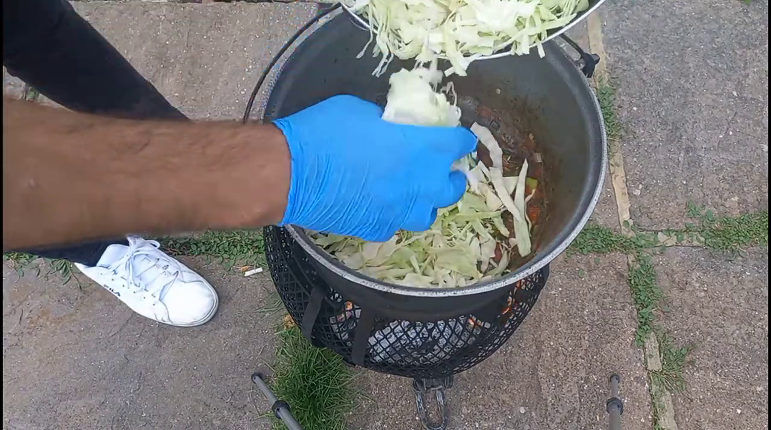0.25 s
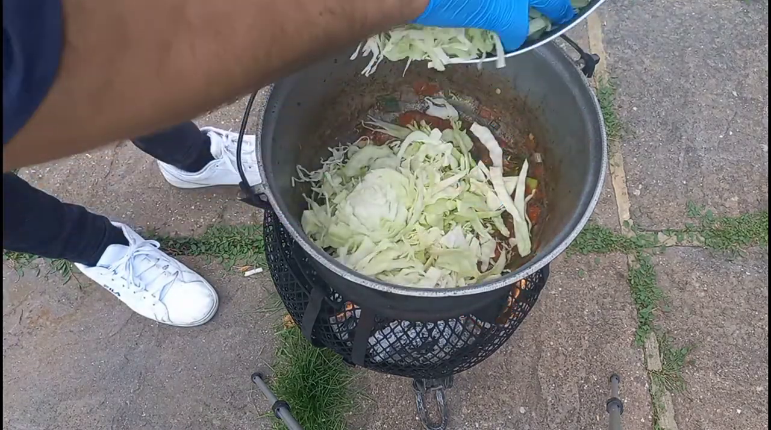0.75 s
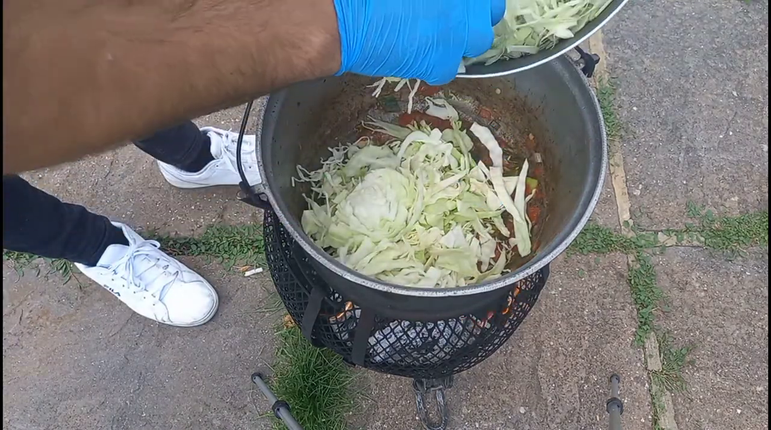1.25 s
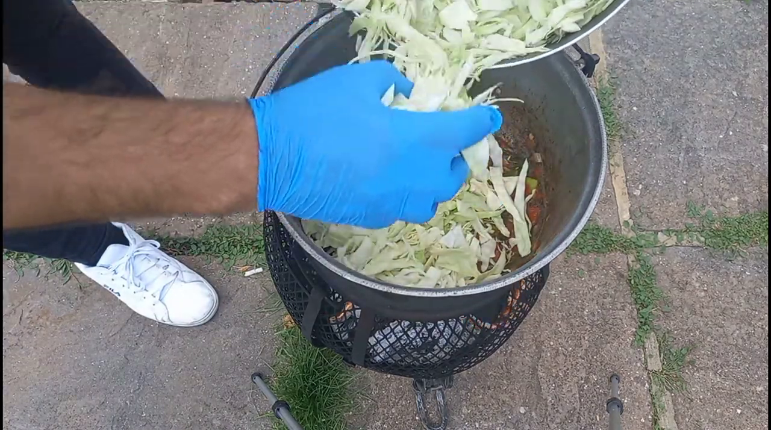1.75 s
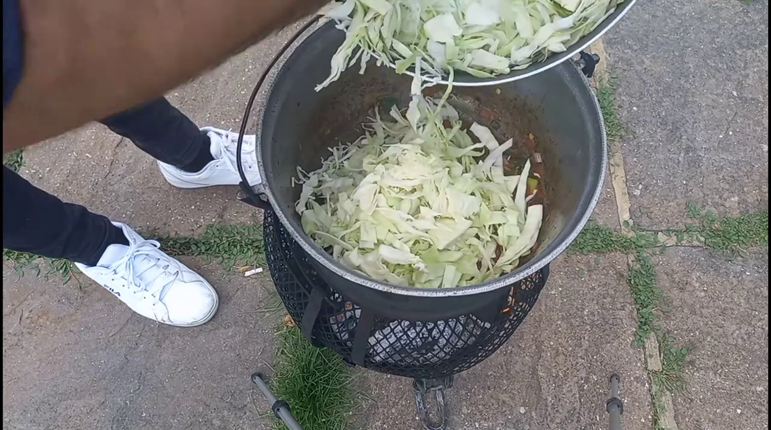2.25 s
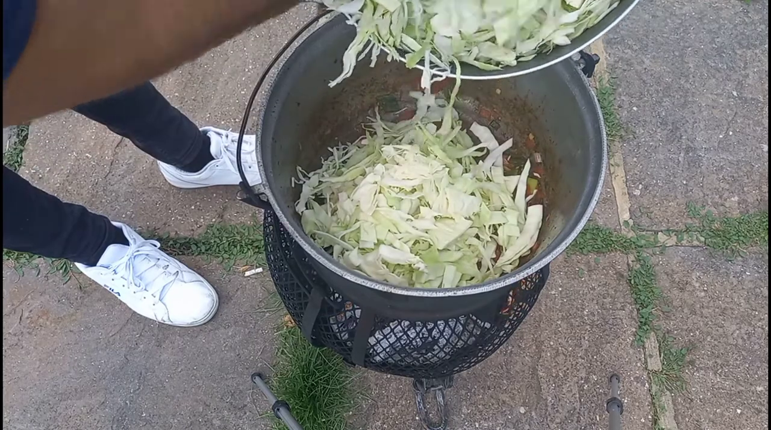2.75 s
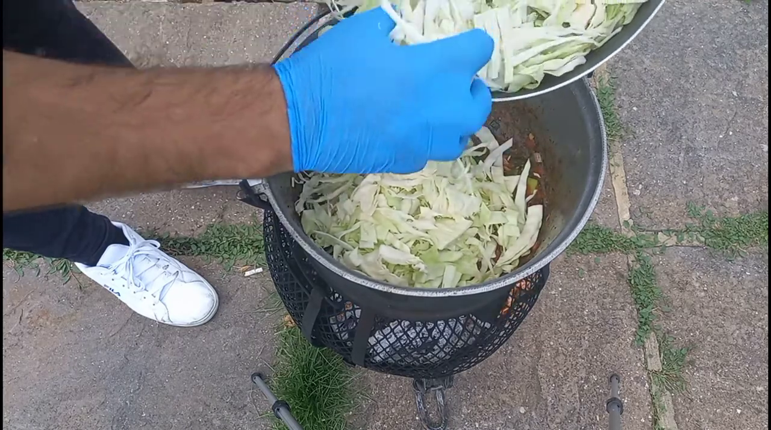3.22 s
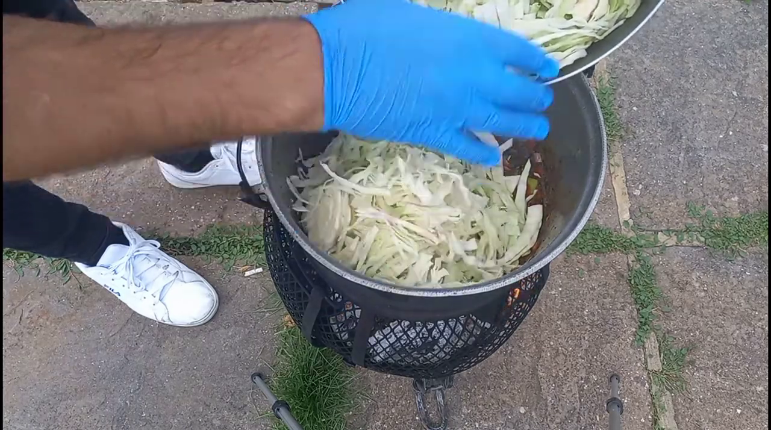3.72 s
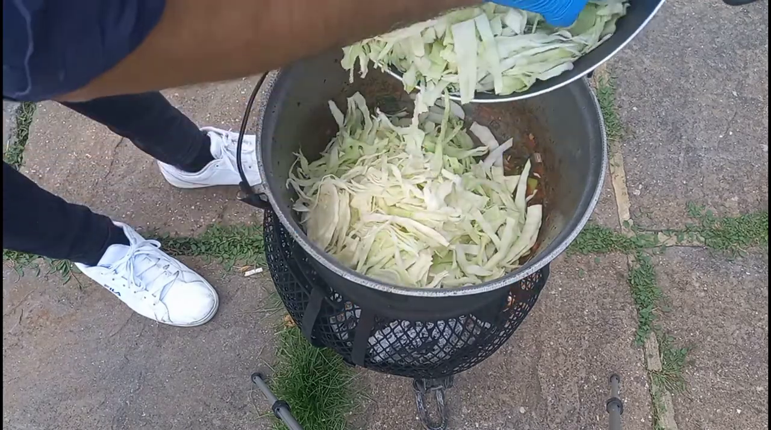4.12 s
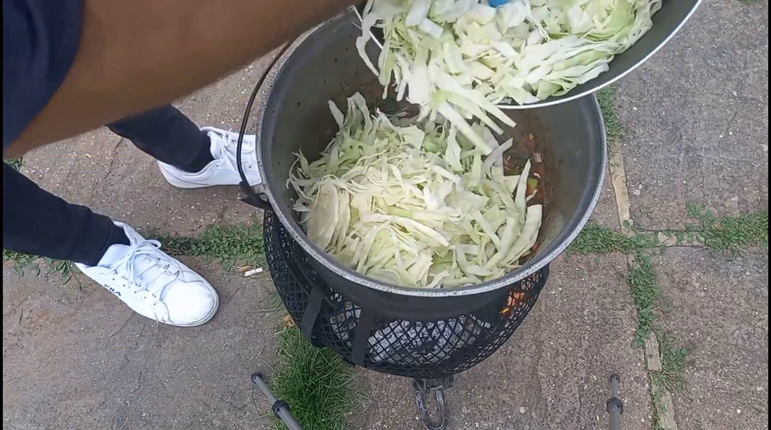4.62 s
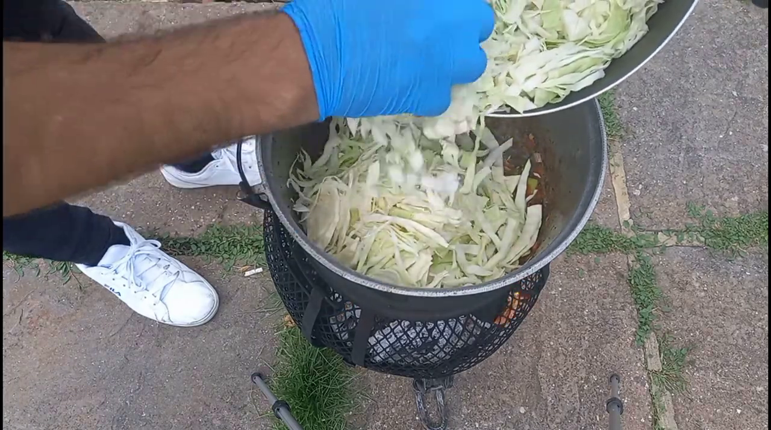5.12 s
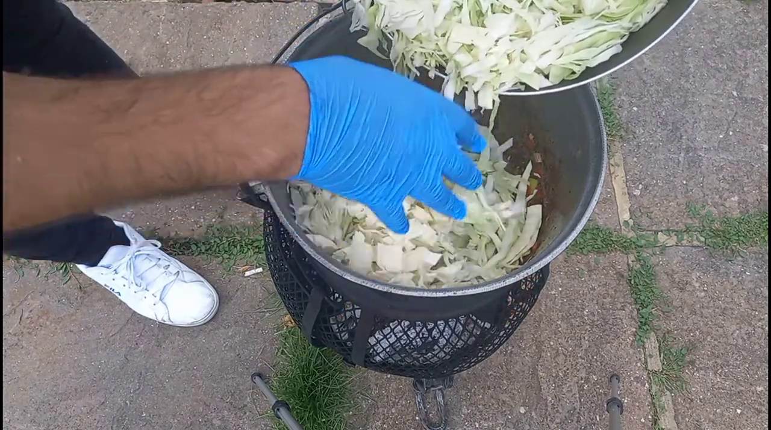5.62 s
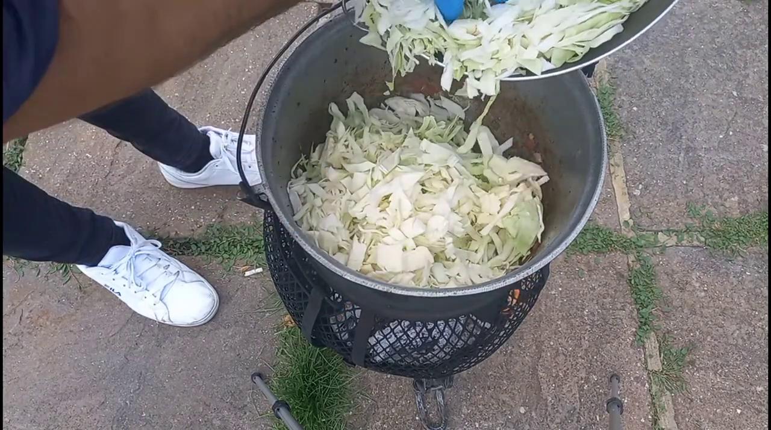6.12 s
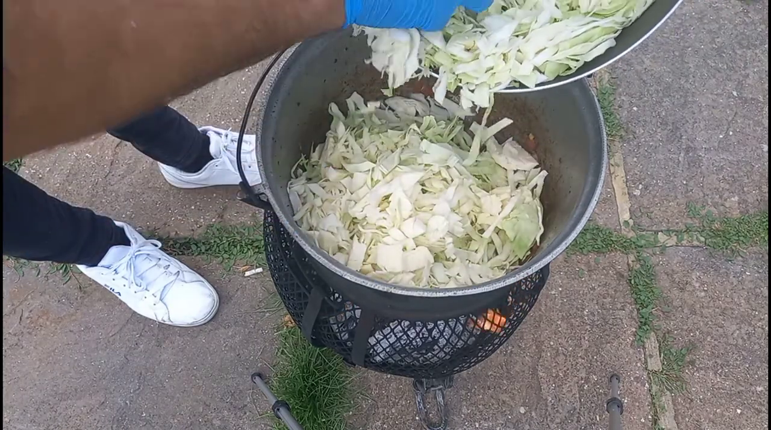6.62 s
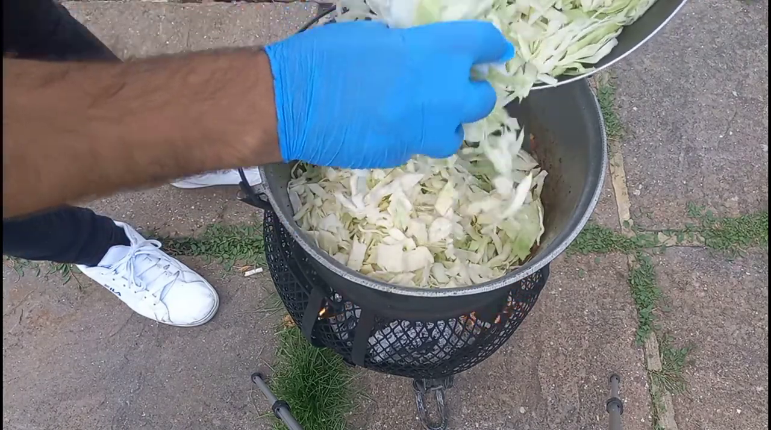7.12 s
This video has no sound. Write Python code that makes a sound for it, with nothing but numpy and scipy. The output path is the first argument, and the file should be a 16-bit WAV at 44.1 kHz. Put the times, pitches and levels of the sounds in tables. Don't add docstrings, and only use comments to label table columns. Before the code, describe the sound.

Quiet sauce simmers while leafy shreds are grabbed and dropped, each stroke starting crisply and fading. Wind thumps softly in the microphone, mostly early. A light metallic tick, later a fuller bowl-on-pot knock with short ring and low boom, punctuate the work. The busiest moment is a stuttering glove rub on hollow metal midway, followed by bright spits, soft bumps and another scrape. Dry open air, near microphone, distant traffic rumble.

```python
import sys
import numpy as np
from scipy import signal
from scipy.io import wavfile

SR = 44100
rng = np.random.default_rng(int(sys.argv[2]) if len(sys.argv) > 2 else 0)


def int16_out(signal):
    q = np.round(np.clip(np.atleast_2d(signal).T, -1, 1) * 32767)
    wavfile.write(sys.argv[1], SR, q.astype(np.int16))


def boost(x):
    u = np.asarray(x, float) / 20
    return 10 ** u


N = 325017

# pitch_hz, level_db (per Hz)
TRAFFIC_COLOUR = [(53, -0.5), (90, -4), (173, -10), (410, -13), (519, -25.5), (705, -20), (799, -13.5),
                  (1030, -21.5), (1230, -32), (1650, -20), (2500, -51), (3250, -37), (5500, -120)]
# pitch_hz, likeness (1 = the same)
LEFT_RIGHT_LIKENESS = [(60, 1), (120, 0.76), (240, 0.94), (480, 0.15), (950, 0.12), (1890, 0.9),
                       (3770, 0.22), (7520, -0.12), (15000, -0.024)]
# time_s, rumble_db, centre_hz
WIND_RUMBLE = [(0.0, -57, 61.6), (0.35, -46.5, 59.4), (0.75, -61, 51.4), (1.03, -64, 45.6),
               (1.46, -48, 50.3), (1.89, -67, 63), (2.73, -63.5, 73), (3.04, -67, 85), (3.6, -70, 85),
               (4.2, -66.5, 84.6), (4.64, -51, 85), (5.03, -62, 94), (5.25, -54.5, 70.4), (5.81, -60, 70),
               (6.42, -54.5, 51), (7.08, -52.5, 59), (7.2, -63, 60.8), (7.37, -54.5, 60.4)]
# peak_s, peak_db, left_right_db, upper_rumble_db
WIND_PUFFS = [(0.0, -37, 0, 4), (0.53, -45, 0.5, 2.5), (0.679, -42.5, 1, 1), (0.8, -47.5, -1.5, 5),
              (0.92, -44.5, 0, 5), (1.27, -49, -2, 6), (1.58, -47.5, 0, 1), (2.0, -54, 3, -3),
              (2.2, -52, 1, -8), (3.14, -48, -3, -2), (3.6, -68, 0.1, -18), (3.86, -58, 0.1, -3),
              (4.02, -56, -1, -3), (4.33, -64, 0.1, -2), (5.25, -49.5, 0, -5), (6.17, -46, -1.5, 4),
              (6.3, -46.5, 1, 6), (6.9, -55, 0.7, 0.1), (7.295, -44.5, 10.5, 3.5)]
# time_s, level_db
SAUCE_LEVEL = [
    (0.0, -68.5),
    (2.34, -64.5),
    (2.61, -63),
    (3.49, -69),
    (4.0, -65.5),
    (4.25, -61),
    (5.87, -71),
    (6.2, -62),
    (7.02, -69.5),
    (7.37, -68),
]
# pitch_hz, level_db (per Hz)
SIZZLE_COLOUR = [(710, -50), (1200, -2), (1640, -6), (2560, -8.5), (3040, -0.5), (3970, -3.5), (5950, -1),
                 (7220, 0), (10200, -8.5), (12700, -11), (14600, -19), (15400, -19)]
# start_s, peak_db, pitch_hz, left_right_db
SNAP_EVENTS = [(0.308, -43, 7000, -4), (0.386, -56, 3220, 4), (0.6883, -41, 7460, 8), (0.858, -37, 7360, 5),
               (0.9707, -53, 7700, 0.5), (2.557, -33.5, 8600, 4), (2.7453, -34, 7240, 0),
               (2.8689, -43, 7300, -1), (3.3323, -49, 6900, -3), (3.775, -45.5, 4620, -1),
               (3.9918, -47, 11600, 1.5), (4.19, -38, 7000, 0.3), (4.2957, -31, 7660, -4),
               (4.313, -28, 7800, 0.3), (4.331, -31, 13500, 0.3), (4.349, -33, 7000, 0.3),
               (4.372, -28, 3200, 7), (4.384, -38, 12000, 0.3), (4.5161, -50.5, 6640, -1),
               (5.1069, -17.5, 8470, 2), (5.2703, -44, 12200, 11), (5.366, -38.5, 8700, -6),
               (5.383, -47, 13000, 2.5), (5.396, -43, 11200, 6), (5.633, -52, 7500, 1.5),
               (5.87, -53, 13000, 1.5), (5.664, -45, 12600, 8), (5.9334, -46, 7200, 0),
               (5.9504, -39.5, 8700, 8), (5.9665, -26, 8530, 1.5), (5.9968, -37, 8100, 2),
               (6.0243, -38, 7140, -5), (6.2228, -43, 3260, -1.0), (6.438, -33, 3100, -6),
               (6.4727, -35, 3690, -9), (6.839, -46, 8300, 4), (7.084, -47, 6800, 1.0),
               (7.115, -52, 4000, -8), (7.211, -49, 8100, -2.5), (7.229, -50, 9027, -3),
               (7.2569, -46, 8100, 0), (7.304, -43, 4200, -3)]
# start_s, peak_db, ring_db, boom_db, hardness_db (per octave)
KNOCK_EVENTS = [(1.2493, -23, -20.5, -35.5, 12), (1.2527, -25.5, -13, -39, 3), (1.262, -41.5, -2, -34, 0),
                (1.2794, -46.5, -1, -8, 1), (3.0729, -23.5, -3, -28, 12), (3.077, -30, -11, -50, 26),
                (3.08, -35, -12, -40, 10), (3.0858, -29.5, -4, -14, 1.5), (3.0877, -31, -7, -22, 7),
                (3.092, -34, -11, -9.5, 12), (3.0995, -51, -9, -15, 5), (3.11, -42.5, 0, -3.5, 3),
                (3.169, -49.5, -10, 3, -8.5), (3.19, -54, -3, -12, 12)]
# pitch_hz, level_db, t60_s (time to fall 60 dB)
BOWL_TONES = [(803, -22.5, 0.51), (903, -17, 0.18), (988, -19.5, 0.14), (1320, -19.5, 0.15),
              (1610, -20, 0.1), (2095, -11, 0.21), (2090.5, -28, 0.6), (2260, -17, 0.046),
              (2505, -9, 0.036), (2772, -17, 0.14), (2640, -17, 0.07), (2890, -20, 0.064),
              (2990, -16, 0.15), (3340, -28, 0.11), (3150, -14, 0.093), (3530, -11, 0.14),
              (3810, -2.5, 0.052), (3740, -8, 0.07), (3584, -11, 0.072), (4021, -20, 0.043),
              (4300, -12, 0.069), (4870, -13, 0.066), (5700, -18, 0.06), (7000, -29, 0.015),
              (5900, -9, 0.02), (7700, -25, 0.035)]
# pitch_hz, level_db, t60_s
CAULDRON_TONES = [(230.5, -4.5, 0.28), (246, -6.5, 0.17), (410, -18, 0.062)]
# pitch_hz, level_db (per Hz)
CRACK_COLOUR = [(470, -54), (800, -40), (3240, -9), (3800, -3.5), (5060, 2), (6980, 4), (10600, -6.5),
                (11400, -1), (15400, -22)]
# start_s, length_s, pitch_hz, level_db, width_hz
SQUEAK_EVENTS = [(0.25, 0.2, 1730, -59, 130), (1.146, 0.09, 2110, -54, 150), (1.17, 0.06, 2800, -50, 220),
                 (1.235, 0.07, 2094, -63, 190), (1.4, 0.05, 1637, -49, 120), (1.264, .07, 3800, -58, 130),
                 (1.323, 0.074, 790, -55.5, 140), (1.952, 0.098, 800, -56, 68), (5.3, 0.65, 995, -65, 130),
                 (5.58, 0.22, 1600, -66, 20), (5.65, 0.1, 2094, -66, 30), (6.238, 0.055, 3280, -48, 420),
                 (6.22, 0.18, 1470, -54, 330), (6.1, 0.41, 1440, -61, 450), (6.435, 0.13, 1510, -58, 360),
                 (6.461, 0.028, 4600, -39.5, 2100), (6.497, 0.039, 2800, -49.5, 630),
                 (0.419, 0.071, 1700, -50, 420), (4.88, 0.13, 210, -49, 89), (4.28, 0.058, 634, -30.5, 62),
                 (4.355, 0.045, 2700, -44, 750), (4.22, 0.17, 1180, -43, 700),
                 (7.073, 0.06, 6950, -55, 460), (7.178, 0.055, 7100, -64, 400), (3.2, 0.17, 790, -60, 81),
                 (4.3, 0.08, 2000, -51, 100)]
# pitch_hz, width_hz, level_db
BELLY_TONES = [(355.3, 42, 4.5), (436, 27.5, 4), (503, 34, -3), (623, 62, -6.5), (802, 120, -8.5),
               (1332, 165, -7.5), (1844, 50, -13.5), (2400, 23, -24), (3380, 130, -18)]
# peak_s, hum_db, swell_s (10 dB), fade_s (10 dB)
GLOVE_RUBS = [(0.681, -44, -0.16, -0.22), (0.86, -58.5, 0.04, 0.34), (1.27, -59, 0.1, .2),
              (1.97, -51.5, -0.08, 0.06), (2.36, -55, -0.74, 0.2), (2.44, -48, -0.45, -0.16),
              (2.54, -55.5, -0.32, 0.2), (2.69, -49, -0.23, -0.28), (3.1, -49, -0.5, 0.08),
              (3.18, -46.5, -0.12, -0.07), (4.1, -51.5, -0.06, 0.14), (4.16, -38.5, -0.0648, 0.2654),
              (4.252, -29, -0.0315, 0.104), (4.304, -32.5, -0.0377, 0.0871), (4.427, -39.5, 0.09, 0),
              (4.5, -70, 0.5, 0.5), (4.701, -40.5, -0.04, 0.126), (4.819, -34, -0.0872, -0.0365),
              (4.91, -53, 0.24, 0.09), (6.01, -50, -0.22, 0.14), (6.079, -46, -0.19, 0.29),
              (6.3, -50, 0.07, -0.25), (6.38, -59, -0.5, 0.2)]
# start_s, jerk_db
HAND_JERKS = [(0.438, -52), (4.164, -44), (4.23, -35), (4.263, -27), (4.269, -22), (4.299, -34),
              (4.339, -31), (4.36, -25.5), (4.373, -28), (4.381, -34), (4.691, -35.5), (4.809, -46),
              (6.251, -45), (6.271, -43.5)]
# start_s, peak_db, pitch_hz, t60_s
BELLY_BUMPS = [
    (0.671, -53.5, 393, 0.24),
    (1.97, -56.5, 394, 0.21),
    (2.359, -42, 352, 0.1),
    (4.893, -52, 324.6, 0.47),
    (4.905, -44, 353.3, 0.33),
    (4.92, -45.5, 335.3, 0.44),
    (5.992, -40.5, 365, 0.19),
    (6.019, -37, 355, 0.04),
    (6.031, -45.5, 213, 0.063),
]
# start_s, peak_db, fade_s (10 dB), crispness_db, fullness_db
SHRED_GRABS = [(0.0, -58.5, 0.39, -14, -4.5), (0.703, -58.5, 0.44, -6, -6), (1.244, -60, 0.12, -11, 14),
               (1.97, -57, 0.07, -7, -0.5), (2.365, -59, 0.1, 1.5, -15), (2.524, -56, 0.34, -0.5, -2),
               (3.092, -56, 0.11, -11, 1.5), (3.99, -60, 0.07, 6, -7), (5.126, -64, 0.26, -2, -1.5),
               (5.372, -60.5, -0.24, 0, -4), (5.975, -59, 0.5, -1, -4.5), (6.5, -58.5, 0.21, -7, -4),
               (7.084, -77, -0.7, -9, -26)]
# peak_s, peak_db, swell_s (10 dB), crispness_db, fullness_db
HAND_SWEEPS = [(0.449, -52.5, 0.02, -3.5, -1), (0.58, -61.5, 0.34, -11.5, -2.5),
               (1.17, -59, 0.46, -9, -6.5), (1.45, -74.5, 1.5, -36, -4), (2.2, -79, 0.8, -22, -3),
               (2.72, -58, 0.26, -7.5, -4.5), (3.3, -73.5, 0.6, -13, -9), (3.652, -62, 0.08, -4, 1.5),
               (4.185, -51.5, 0.0859, -3, -4), (4.255, -53.5, 0.077, -2, 4), (4.31, -48, 0.0433, 1, -4),
               (4.345, -47.5, 0.0627, -4, -3), (4.384, -50, 0.0267, -4, 0), (4.42, -60, 0, 6, -14),
               (4.691, -51, 0.14, -3.5, -6), (4.84, -57, 0.2, -2, -5.5), (5.569, -62.5, 0.1, -4, -4.5),
               (5.94, -77, -0.1, -24, -19), (6.03, -65, 0.13, 0, -12), (6.277, -54.5, 0.1567, -4.5, 2),
               (6.42, -58, 0.21, -9.5, -12), (6.48, -65, 0.03, -13, -1.5), (6.72, -70, -0.1, 12, -10),
               (7.15, -65, -0.15, 5, -11), (7.22, -73, -0.03, -7, 11), (6.9, -72, 0.13, 6, -3),
               (7.37, -66, 0.18, -7, -3.5)]
# pitch_hz, level_db (per Hz)
RUSTLE_COLOUR = [(350, -12), (600, -9), (939, 0.5), (1030, -4), (1280, -2.5), (2040, -1.5), (2860, 2.5),
                 (4730, -1.5), (7300, -1.5), (13300, -1), (15400, -9)]


def rms_one(x):
    return x / np.sqrt(np.mean(x ** 2) + 1e-20)


def left_right(db):
    return boost(db * np.array([[.5], [-.5]]))


def in_time(rows):
    s, *columns = np.transpose(rows)
    return [np.interp(np.arange(N) / SR, s, c) for c in columns]


def at_hz(points, hz):
    pitches, values = np.array(points)[:, 0], np.array(points)[:, 1]
    return np.interp(np.log(hz), np.log(pitches), values)


def drift(rate):
    r = np.exp(-80 * np.pi * rate / SR)
    chance = rng.standard_normal(N // 40 + 2002)
    slow = signal.lfilter([1], [1, -2 * r, r * r], chance)[2000:]
    return np.interp(np.arange(N) / 40, np.arange(len(slow)), rms_one(slow))


def ring(drive, hz, t60):
    r, w = boost(-60 / (t60 * SR)), 2 * np.pi * hz / SR
    return signal.lfilter([0, np.sin(w)], [1, -2 * r * np.cos(w), r * r], drive + 1e-18)


def clicks(times, levels_db):
    train = np.zeros(N)
    train[(np.asarray(times) * SR).astype(int)] = boost(levels_db)
    return train


def grains(per_s, spread_db, t60, smooth):
    sizes = boost(spread_db * np.minimum(rng.exponential(1, N), 3.2))
    sizes = sizes * (rng.random(N) < per_s / SR)
    bursts = rms_one(signal.lfilter([1], [1, -boost(-60 / (t60 * SR))], sizes))
    smooth = np.clip(smooth, 0, 1)
    return np.sqrt(smooth + (1 - smooth) * bursts ** 2)


def banded_noise(spectrum, patchy_db, gate=1, top_db=0, bottom_db=0):
    low_hz, high_hz = spectrum[0][0], min(spectrum[-1][0], 17000)
    edges = np.geomspace(low_hz, high_hz, int(2.5 * np.log2(high_hz / low_hz)) + 1)
    together = drift(9.1)
    white = rng.standard_normal((2, 2, N)) * gate
    out = 0
    for k, (low, high) in enumerate(zip(edges, edges[1:])):
        band = signal.butter(2, [low, high], "band", fs=SR, output="sos")
        mid, side = signal.sosfilt(band, white[k % 2])
        hz = np.sqrt(low * high)
        alike = np.clip(at_hz(LEFT_RIGHT_LIKENESS, hz), -1, 1)
        octaves = np.log2(hz / 5000)
        tilt_db = top_db * np.clip(octaves - .3, 0, 1) + bottom_db * np.clip(-octaves - .3, 0, 1)
        flicker_db = patchy_db * (.6 * together + drift(14))
        gain = boost(at_hz(spectrum, hz) + tilt_db + flicker_db)
        out = out + gain * (np.sqrt(1 + alike) * mid + np.sqrt(1 - alike) * side * [[1], [-1]])
    return rms_one(out)


def swells(s, db, swell_s, fade_s, *colours):
    s, db, swell_s, fade_s = [np.reshape(column, (-1, 1)) for column in (s, db, swell_s, fade_s)]
    age = np.arange(0, N + 40, 40) / SR - s
    span = np.where(age < 0, swell_s, fade_s)
    power = boost(db - 10 * np.abs(age) / np.maximum(span, .002)) ** 2 + 1e-30
    total = power.sum(axis=0)
    coarse = [10 * np.log10(total)] + [colour @ power / total for colour in colours]
    return [np.interp(np.arange(N) / 40, np.arange(len(c)), c) for c in coarse]


def traffic():
    level_db = -65 + 1.5
    return boost(level_db) * banded_noise(TRAFFIC_COLOUR, 2.85)


def wind():
    level_db, centre_hz = in_time(WIND_RUMBLE)
    s, db, pan, upper = np.transpose(WIND_PUFFS)
    swell_s, fade_s = 0.044, 0.041
    puffs_db, pan_db, upper_db = swells(s, db, swell_s, fade_s, pan, upper)
    shared, left, right = rng.standard_normal((3, N))
    white = shared + .5 * np.array([left, right])
    out = 0
    for hz in (46.6, 56.0, 72.8, 90.1, 125.3, 166.0):
        band = signal.butter(2, [hz / 1.134, hz * 1.085], "band", fs=SR, output="sos")
        lump = rms_one(signal.sosfilt(band, white))
        out = out + lump * boost(-14 * np.abs(np.log2(hz / centre_hz)) + upper_db * (hz > 110))
    return np.hypot(boost(level_db), boost(puffs_db)) * left_right(pan_db) * rms_one(out)


def sizzle():
    bursts = grains(1500, 12.0, 0.0037, smooth=0.7)
    return boost(in_time(SAUCE_LEVEL)[0]) * banded_noise(SIZZLE_COLOUR, 1.4, bursts)


def snaps():
    splash_share, splash_t60_s = 0.42, 0.011
    ring_share, ring_t60_s = 0.74, 0.0075
    out, age = np.zeros((2, N)), np.arange(1500) / SR
    chance = rng.standard_normal((len(SNAP_EVENTS), 2, len(age)))
    click = 1. * (age == 0)
    for (s, db, hz, pan_db), noise in zip(SNAP_EVENTS, chance):
        splash = noise * boost(-60 * age / splash_t60_s)
        tick = splash_share * splash - click
        bright_tick = signal.lfilter([1, -2, 1], [1, -1.5, .56], tick)
        snap = bright_tick + ring_share * ring(click + .05 * splash, hz, ring_t60_s)
        at = int(s * SR)
        out[:, at:at + len(age)] += .5 * boost(db) * left_right(pan_db) * snap
    return out


def knocks():
    crack_t60_s, crack_rise_s = 0.026, 0.00067
    s, peak_db, ring_db, boom_db, hardness = np.transpose(KNOCK_EVENTS)
    time, envelope, out = np.arange(N) / SR, np.zeros(N), np.zeros((2, N))
    for start, db in zip(s, peak_db):
        age = np.maximum(time - start, 0)
        envelope += boost(db - 6.5 - 60 * age / crack_t60_s) * np.minimum(age / crack_rise_s, 1)
    for k, (hz, db, t60) in enumerate(BOWL_TONES):
        spared_db = hardness * np.log2(hz / 3500) * (hz < 3500)
        struck = clicks(s, peak_db + ring_db + db + spared_db)
        contact_s = 10 / hz
        pressed = ring(struck, hz, contact_s) * 2 * np.log(1000) / (contact_s * SR)
        mode = ring(pressed, hz, t60)
        lag = 2 + rng.integers(0, 2, 2).sum()
        out += (-1) ** k * np.array([mode, np.roll(mode, lag)])
    boom = sum(ring(clicks(s, peak_db + boom_db + db), hz, t60) for hz, db, t60 in CAULDRON_TONES)
    return out + boom + envelope * banded_noise(CRACK_COLOUR, 0)


def squeaks():
    out = np.zeros(N)
    for s, length, hz, db, width in SQUEAK_EVENTS:
        friction = rng.standard_normal(22050)[:int(length * SR)]
        tone = rms_one(ring(ring(friction, hz, 2.2 / width), hz, 2.2 / width))
        even = 3 * tone / (2.5 + np.abs(signal.hilbert(tone)))
        shape = signal.windows.tukey(len(tone), .8)
        out[int(s * SR):][:len(tone)] += boost(db - 6) * even * shape
    return out


def bowl_hum():
    slips = rng.standard_normal(N) * grains(60, 9.3, 0.0063, smooth=0.85)
    held_db = -70.5 - 4
    rub_gain = np.hypot(boost(swells(*np.transpose(GLOVE_RUBS))[0] - 6.0), boost(held_db))
    jerks = clicks(*np.transpose(HAND_JERKS))
    scuffs = signal.lfilter([.12], [1, -.992], jerks) * rng.standard_normal(N)
    modes, plucked = 0, 0
    for k, (hz, width, db) in enumerate(BELLY_TONES):
        sign = (-1) ** k
        modes = modes + boost(db) * rms_one(ring(slips, hz, 2.32 / width)) * sign
        plucked = plucked + boost(.5 * db - 6.5) * ring(scuffs, hz, 1.44 / width) * sign
    hum = rub_gain * rms_one(modes) + plucked
    for s, db, hz, t60 in BELLY_BUMPS:
        bump = ring(clicks([s], [db]), hz, t60)
        hum = hum + signal.lfilter([.1], [1, -.9], bump)
    return hum


def rustle():
    s, db, span, crisp, full = np.transpose(list(SHRED_GRABS) + list(HAND_SWEEPS))
    grab = np.arange(len(s)) < len(SHRED_GRABS)
    swell_s = np.where(grab, 0.011, span)
    fade_s = np.where(grab, span, 0.65 * span)
    level_db, crisp_db, full_db = swells(s, db, swell_s, fade_s, crisp, full)
    crackles = grains(900, 2.1, 0.013, smooth=0.57)
    noise = banded_noise(RUSTLE_COLOUR, 1.1, crackles, crisp_db + 1.5, full_db + 1.5)
    return boost(level_db + 4.5) * noise


def scene():
    background = traffic() + wind()
    pot = sizzle() + squeaks() + bowl_hum() * left_right(0.6) + rustle()
    pot[1] = np.roll(pot[1], 4)
    return background + snaps() + knocks() + pot


def low_pass(x):
    return signal.sosfilt(signal.butter(12, 15760, fs=SR, output="sos"), x)


def record(dry):
    bass_cut = signal.butter(4, 39., "high", fs=SR, output="sos")
    top_cut = signal.cheby2(12, 70, 16900, fs=SR, output="sos")
    mix = signal.sosfilt(bass_cut, dry)
    mix = mix + .5 * signal.lfilter(*signal.iirpeak(7250., 9., fs=SR), mix)
    mix = signal.sosfilt(top_cut, mix)
    return low_pass(mix)


dry = scene()
out = record(dry)
int16_out(out)
```